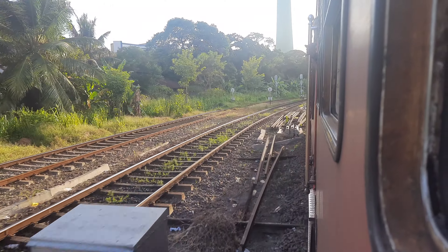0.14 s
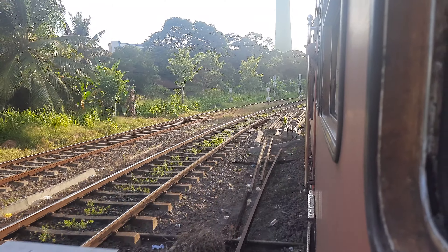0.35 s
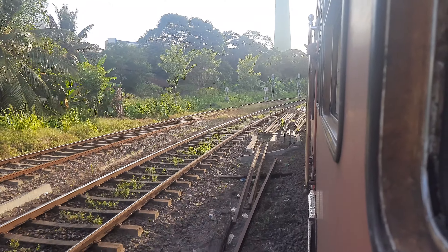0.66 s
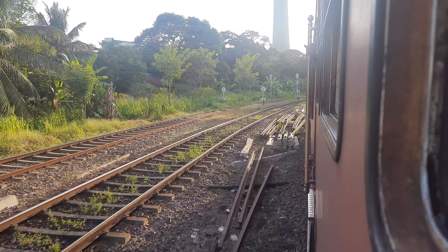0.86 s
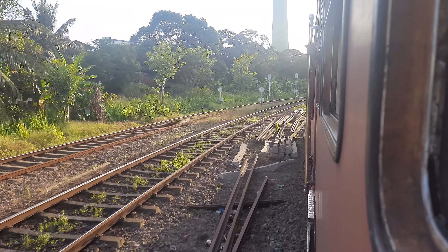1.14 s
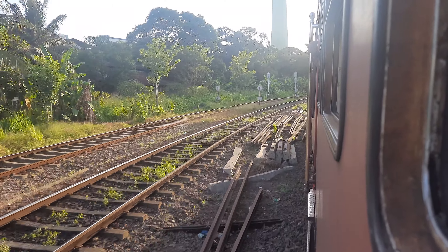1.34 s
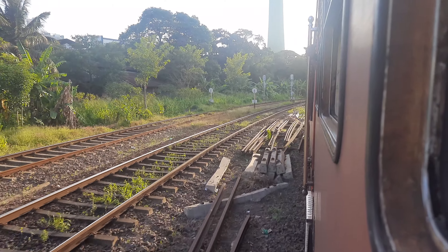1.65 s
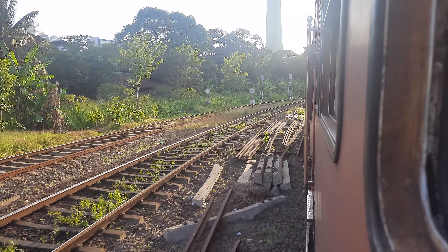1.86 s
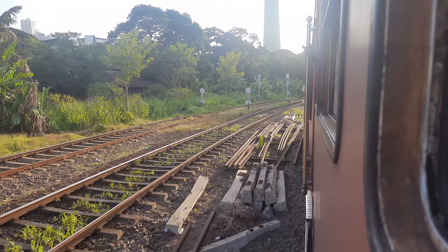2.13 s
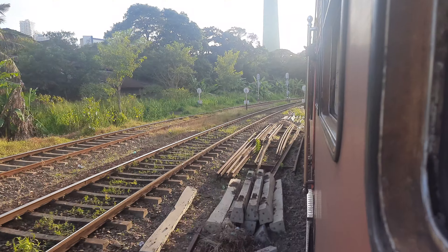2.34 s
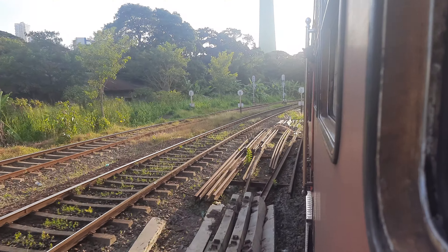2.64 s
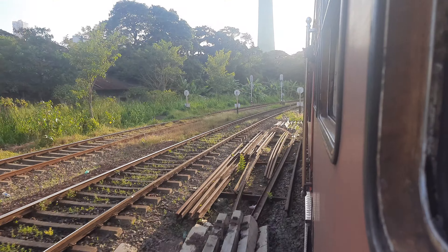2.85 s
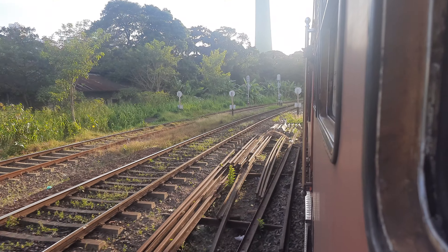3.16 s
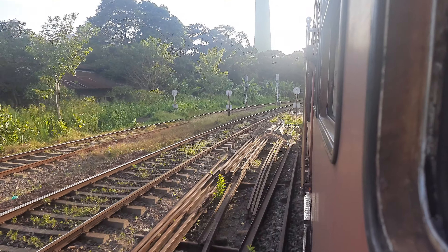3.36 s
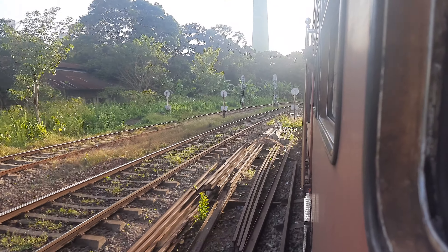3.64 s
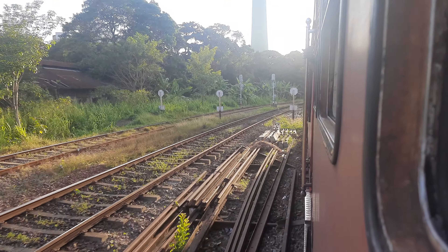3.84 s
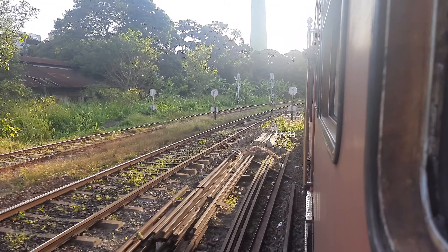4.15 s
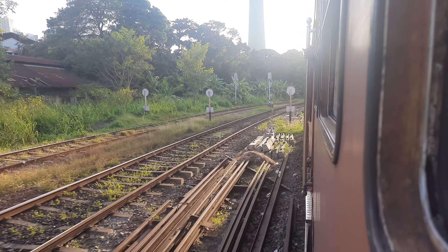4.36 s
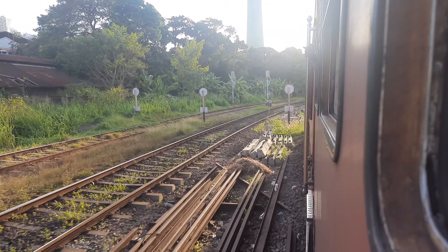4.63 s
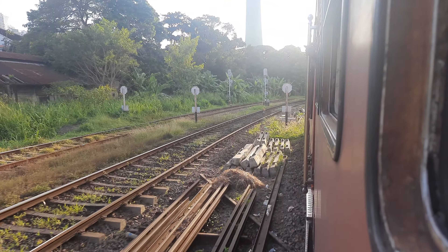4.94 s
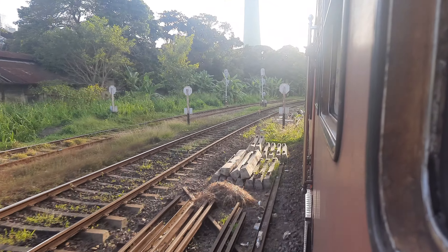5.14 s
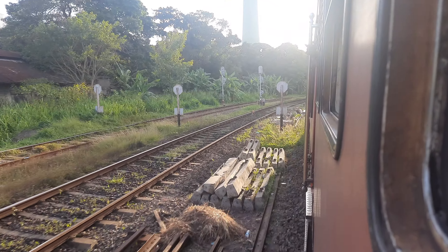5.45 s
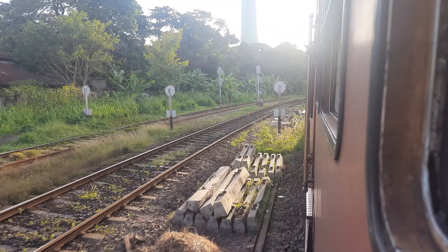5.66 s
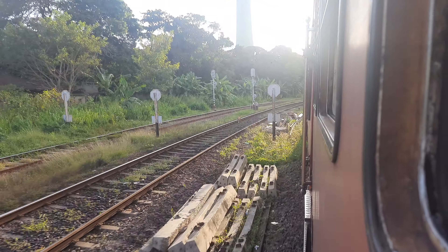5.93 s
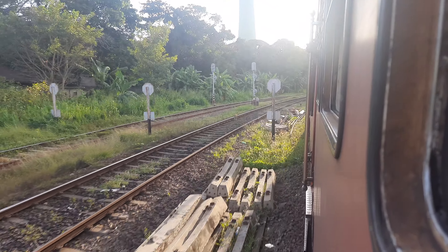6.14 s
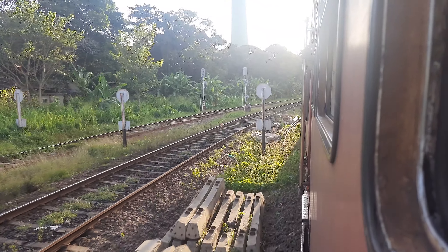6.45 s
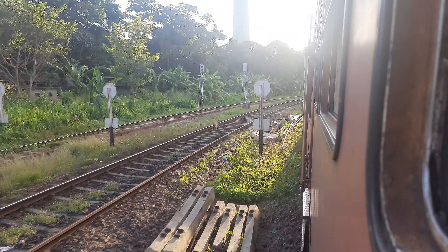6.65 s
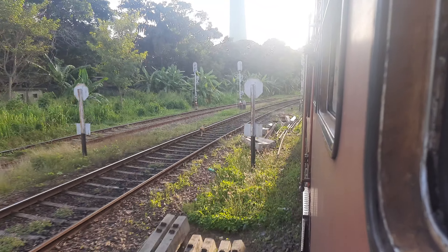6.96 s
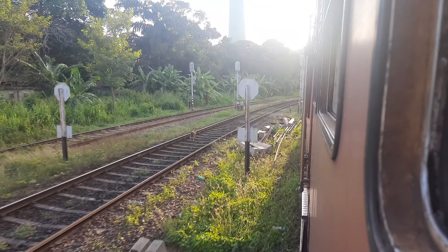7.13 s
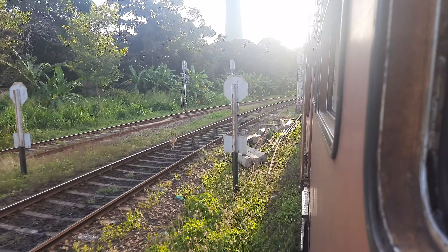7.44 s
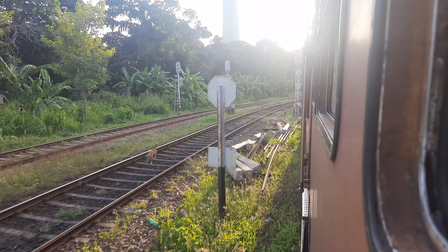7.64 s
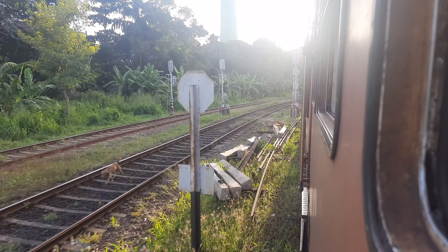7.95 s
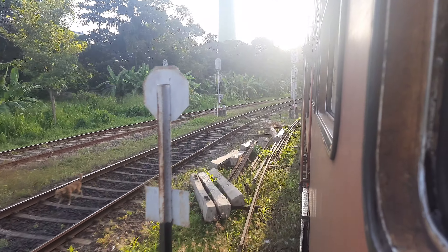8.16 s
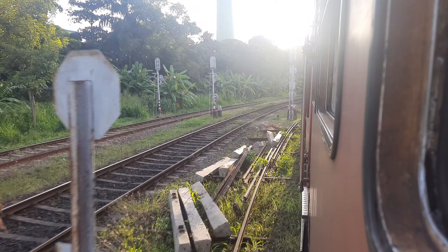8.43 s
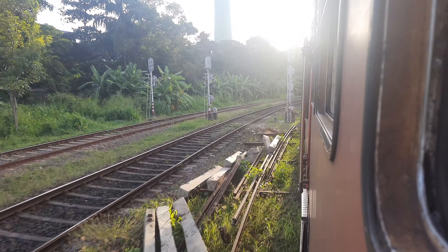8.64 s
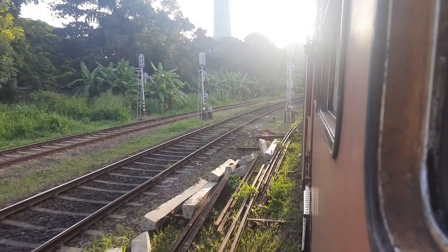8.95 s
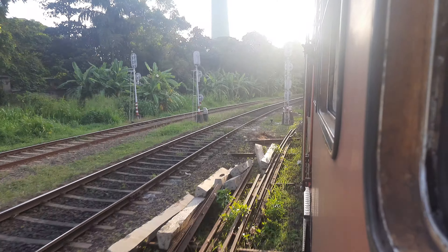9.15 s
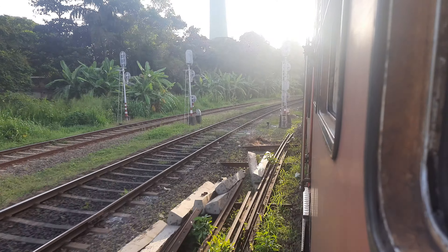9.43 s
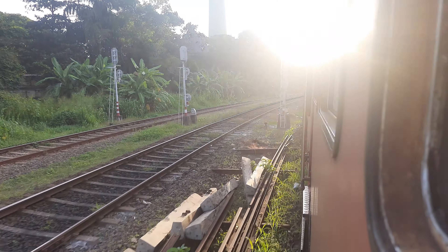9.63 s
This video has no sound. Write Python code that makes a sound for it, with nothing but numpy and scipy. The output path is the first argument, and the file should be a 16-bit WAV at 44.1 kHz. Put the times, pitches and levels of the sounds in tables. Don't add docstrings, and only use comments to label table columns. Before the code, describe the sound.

A slow passenger coach rumbles and knocks over points while wheel flanges scrape and ring in metallic bursts, with one brief distant two-tone horn.

```python
import sys
import numpy as np
from scipy import signal
from scipy.fft import rfft, irfft
from scipy.io import wavfile
from scipy.ndimage import uniform_filter1d

SR = 44100
rng = np.random.default_rng(int(sys.argv[2]) if len(sys.argv) > 2 else 0)


def output_pcm(signal):
    pcm = np.clip(np.atleast_2d(signal).T, -1, 1) * 32767
    wavfile.write(sys.argv[1], SR, np.round(pcm).astype(np.int16))


def linear_from_db(decibels):
    return 10 ** (np.asarray(decibels, float) / 20)


N = 431738
T = np.arange(N) / SR

# [start t/s, length t/s, first level/dB, last level/dB]
SCRAPES = [(-.05, 0.075, -20, -26), (0.084, 0.06, -10, -32.5), (0.216, 0.038, -16, -34),
           (0.272, 0.052, -21, -32.5), (0.48, .02, -29, -37.5), (0.677, 0.07, -52, -27),
           (0.721, 0.16, -31, -30.5), (0.993, 0.57, -44.5, -40.5), (1.13, 0.025, -37, -51),
           (1.445, .03, -18, -33.5), (1.54, 0.18, -46, -40), (2.123, 0.44, -25, -27.5),
           (2.412, 1.244, -22, -23), (3.748, 0.42, -44, -37.5), (4.249, 0.45, -24.5, -34),
           (4.705, 0.47, -41, -57), (5.046, 0.07, -15.5, -26), (5.21, 0.059, -46, -27),
           (5.278, 0.073, -14.5, -25.5), (5.37, 0.092, -26, -24), (5.55, 0.11, -47.5, -50),
           (5.76, 0.15, -53, -38.5), (6.041, 0.19, -30, -33.5), (6.296, 0.28, -41, -36),
           (6.588, 0.69, -35.5, -33.5), (7.147, 0.087, -31, -36), (7.69, 0.94, -20.5, -29.5),
           (8.624, 0.13, -21, -28), (8.905, 0.48, -28, -28.5), (9.054, 0.073, -21, -27),
           (9.515, .3, -34.5, -32.5)]
# [t/s, peak level/dB, rail clank level/dB re the peak]
FLANGE_STRIKES = [(0.1, -18, -4), (0.231, -12.5, -22), (0.288, -21, -23), (0.514, -17.5, -9),
                  (0.682, -18.5, -1), (1.1403, -23, -10), (1.4506, -19.5, -16), (3.8534, -33.5, 14),
                  (4.0, -30, -6), (4.2009, -23, 6), (4.4294, -24, 9), (5.058, -16, -7), (5.229, -18, -2),
                  (5.295, -20.5, 10.5), (5.409, -24, 9), (5.5, -22, 4), (6.0694, -47, 0), (7.3894, -25, 4),
                  (7.696, -22, -11)]
# [f/Hz, width f/Hz, level/dB]
NEAR_WHEEL = [(1745, 75, -6), (2590, 90, -2.5), (2940, 36, -11), (3415, 130, -5), (3960, 45, -13),
              (4250, 70, -3.5), (4660, 96, -14), (5170, 110, -4), (6020, 90, 2), (6870, 120, -5),
              (7730, 140, -2), (8540, 100, -11), (9500, 160, -17), (10350, 270, -13), (11130, 170, -9),
              (11960, 140, -5), (12790, 130, -5), (13570, 150, -8), (14400, 500, -11), (15300, 400, -15)]
# [f/Hz, width f/Hz, level/dB]
OTHER_WHEEL = [(2066, 16, 5.5), (2680, 260, -2), (3590, 1400, -6), (3950, 200, -0.5), (4470, 450, -0.5),
               (5370, 61, -6.5), (6240, 150, -4), (6940, 110, -3.5), (8080, 35, 3), (9500, 77, -9),
               (11340, 97, -4.5), (11430, 150, -3.5), (12500, 300, -5), (13300, 500, -2),
               (14500, 900, -12.5), (15300, 700, -7)]
# [f/Hz, width f/Hz, level/dB]
THIRD_WHEEL = [(1695, 24, -4.5), (2120, 82, 1.5), (2600, 140, -4.5), (3430, 130, -2.5), (4400, 120, 0),
               (5327, 42, -4.5), (6340, 56, -8.5), (7120, 74, -6.5), (8080, 70, -7), (8770, 39, -12),
               (10160, 99, -20), (11420, 73, -10), (12600, 140, -10), (13000, 230, -13)]
# [from t/s, to t/s, share of power]
OTHER_TURNS = [
    (-.1, .06, .5),
    (.69, .95, 1),
    (6.05, 7.55, 1),
    (8.92, 9.9, 1),
]
# [from t/s, to t/s, share of power]
THIRD_TURNS = [
    (2.13, 2.436, 0.59),
    (4.26, 4.948, 0.59),
]
# [from t/s, to t/s, f/Hz, level/dB]
WAVERS = [(0.098, .3, 4250, 4), (.3, .7, 1745, -9), (1.2, 1.6, 3415, 3), (2.202, 2.496, 2590, -2.5),
          (2.296, 2.4, 5327, -14), (2.1, 2.398, 3415, -5), (2.503, 2.8, 1745, -6), (2.6, 2.9, 5170, -3),
          (2.9, 3.1, 3415, -3.5), (2.9, 3.5, 4250, 2), (2.996, 3.196, 2590, -3.5), (3.1, 3.293, 1745, -5),
          (3.3, 3.397, 7730, -1.5), (3.295, 3.7, 3415, -0.5), (3.597, 3.7, 4250, -4),
          (4.385, 4.49, 1695, 10), (4.493, 4.6, 4400, 6), (4.288, 4.6, 5327, 5), (4.698, 5.0, 8000, 11.5),
          (5.2, 5.4, 7730, -2.5), (5.41, 5.493, 5170, 5), (5.6, 5.8, 6870, 5), (6.203, 7.3, 6940, -7),
          (7.688, 7.9, 1745, -4.5), (7.8, 7.9, 2590, 2.5), (7.9, 8.802, 3415, -3.5), (7.9, 8.0, 4250, -1),
          (7.897, 8.0, 5170, -4), (8.095, 8.2, 6020, -1), (8.1, 8.5, 2590, 1.5), (8.492, 8.8, 2590, -6.5),
          (8.498, 8.698, 1745, -11), (8.5, 8.9, 5170, -5), (8.4, 8.6, 6870, -5)]
# [start t/s, length t/s, level/dB]
SHRILL = [
    (0.486, 0.15, 8.5),
    (1.0, 0.54, 1.5),
    (4.004, 0.45, -1.5),
    (5.388, 0.26, 6),
    (8.552, 0.33, 4.5),
    (9.448, .3, 2.5),
]
# [f/Hz, level/dB per Hz]
FRICTION_HISS = [(590, -43), (1000, 13.5), (1450, -7), (1750, 9), (2280, 5.5), (2590, 1), (3460, -8.5),
                 (3750, -14), (6040, -19.5), (7880, -13.5), (9280, -29.5), (12400, -22), (16000, -32)]
# [f/Hz, level/dB per Hz]
TRAIN_HISS = [(1200, -0.5), (3500, -6), (9000, -15.5), (15000, -23)]
# [t/s, shake level/dB, floor level/dB]
ROLLING = [(0, -30.5, -3), (.54, -35.5, -3.5), (.98, -31, -2), (1.75, -27.5, -1), (1.9, -32, -6),
           (2.1, -29.5, 1), (2.3, -40, 2.5), (3.45, -39, 3), (3.7, -31.5, -9), (4.7, -36, -4),
           (5.2, -33, 3.5), (5.5, -30, -2), (7.3, -27.5, -7), (7.65, -37, 6), (8.3, -33.5, -5.5),
           (8.8, -30, 3), (9.2, -30, -5), (9.79, -20.5, -22)]
# [f/Hz, level/dB per Hz]
RUMBLE = [(15, -52), (25, 18), (86, 12), (167, -8.5), (209, -1.5), (249, -6), (286, -4), (377, -13),
          (544, -11), (812, -11.5), (933, -10), (1250, -18), (1600, -14), (2080, -23), (3520, -120)]
# [t/s, peak level/dB, bogie f/Hz]
KNOCKS = [(0.126, -17, 108), (0.516, -11.5, 97), (0.894, -4.5, 288), (1.122, -7.5, 155), (1.451, -5, 104),
          (1.688, -10, 141), (2.05, -21, 129), (3.175, -17, 195), (3.584, -13, 298), (3.691, -12.5, 240),
          (3.85, -5.5, 220), (3.998, -10.5, 324), (4.112, -10, 415), (4.225, -5.5, 213), (4.417, -9.5, 158),
          (4.611, -11.5, 277), (5.232, -8, 139), (5.295, -6, 209), (5.543, -8, 283), (5.794, -15, 201),
          (5.889, -15, 113), (6.302, -10.5, 220), (6.485, -13, 243), (7.078, -7.5, 147), (7.205, -6.5, 225),
          (7.386, -5, 307), (8.366, -9.5, 271), (8.731, -8.5, 99), (9.033, -12, 151), (9.334, -11, 229)]
# [t/s, peak level/dB, f/Hz]
JOLTS = [(0.078, -12.5, 221), (0.311, -22, 223), (0.692, -11.5, 219), (0.768, -10.5, 296),
         (0.998, -12, 313), (1.199, -13, 283), (1.648, -32, 86.1), (1.739, -22, 80.7), (2.121, -13, 266),
         (2.316, -17.5, 237), (2.389, -13.5, 119), (2.429, -13, 157), (2.495, -20, 102), (2.588, -12, 188),
         (2.719, -35, 132), (3.1, -34, 80.7), (3.254, -12.5, 121), (3.359, -21, 140), (3.633, -27, 269),
         (3.779, -18, 290), (4.573, -25, 277), (4.658, -9, 306), (4.909, -12, 278), (5.387, -11, 81),
         (5.457, -12, 304), (5.676, -17, 114), (5.834, -12, 135), (6.07, -13, 215), (6.103, -30, 94.2),
         (6.209, -9.5, 223), (6.369, -14, 223), (6.581, -12, 222), (6.634, -12, 240), (6.693, -24, 234),
         (6.783, -10, 231), (6.807, -11, 102), (6.875, -10, 255), (6.991, -9, 108), (8.491, -4, 136),
         (8.554, -5.5, 230), (8.689, -10, 310), (8.807, -9, 291), (8.88, -11, 96.8), (9.064, -6.5, 199),
         (9.145, -8, 270), (9.216, -22, 243), (9.354, -12, 280), (9.403, -6.5, 215), (9.47, -5, 306),
         (9.509, -8, 310), (9.615, -19, 280), (9.652, -19, 282), (9.739, -19, 276)]
# [start t/s, length t/s, level/dB]
LULLS = [(1.259, 0.077, -5.5), (1.87, 0.066, -4), (1.974, .03, -5), (2.9, 0.23, -2.5), (4.294, 0.049, -1.5),
         (5.5, .1, -3), (5.777, 0.054, 3), (5.936, 0.12, -3), (6.38, 0.25, -2.5), (1.7, 0.16, -1.5),
         (5.29, 0.032, -3), (4.2, 0.036, 4), (6.32, 0.05, -2.5), (5.67, 0.015, 4.5), (3.1, 0.076, 1.5),
         (3.92, .06, -2.5), (8.95, .06, 0.5)]
# [from t/s, to t/s, f/Hz, level/dB]
SINGING = [(0, .14, 622, -30.5), (1.5, 1.77, 4300, -41), (2.39, 2.47, 4388, -30), (2.85, 3.01, 920, -35),
           (5.06, 5.18, 3410, -33), (5.07, 5.22, 2600, -34), (5.3, 5.38, 3410, -33), (5.5, 5.62, 2600, -38),
           (8.2, 8.48, 2590, -33), (2.52, 2.59, 2600, -33), (7.8, 8.3, 880, -39), (1.42, 1.68, 97, -21.5),
           (3.22, 3.65, 1654, -42), (3.68, 3.8, 520, -29), (4.38, 4.62, 945, -40), (5.29, 5.34, 1740, -33),
           (5.41, 5.51, 1743, -28.5), (3.68, 3.8, 270, -29), (6.6, 7.4, 4690, -43), (7.2, 7.36, 2000, -37),
           (8.65, 8.75, 4250, -34), (8.95, 9.42, 4370, -33), (9.0, 9.4, 8000, -33), (8.75, 8.92, 100, -25),
           (6.75, 7.1, 100, -28), (9.45, 9.75, 290, -25), (5.53, 5.66, 3410, -40), (.69, .9, 760, -40.5),
           (.05, .38, 930, -44.5), (6.55, 6.85, 270, -29),
           (2.46, 2.52, 5170, -30), (2.55, 2.72, 6020, -27.5), (2.58, 2.7, 8000, -27),
                (2.18, 2.3, 4380, -32), (6.8, 7.01, 1996, -42), (2.29, 2.33, 2120, -36),
                (2.801, 2.9, 6700, -33), (4.5, 4.6, 1720, -35.5), (1.7, 1.79, 280, -26),
                (4.58, 4.63, 320, -25), (5.06, 5.14, 6300, -36), (3.0, 3.8, 6020, -31.5),
                (8.08, 8.25, 870, -33), (5.07, 5.12, 5150, -34), (5.41, 5.5, 7750, -31),
                (3.36, 3.55, 5150, -32), (2.95, 3.09, 1750, -35), (8.65, 8.72, 6900, -30),
                (9.65, 9.71, 313, -25), (9.5, 9.6, 550, -32.5), (8.52, 8.6, 220, -26.5),
                (.1, .15, 3100, -38), (0.11, .14, 6020, -35), (.235, .26, 6020, -34),
                (.235, .26, 4300, -34), (.285, .31, 6500, -33), (2.64, 2.9, 920, -38),
                (2.47, 2.54, 1250, -40), (5.6, 5.78, 6020, -38), (.76, .85, 4000, -35),
                (.72, .8, 8010, -37), (7.72, 7.8, 6870, -30), (.1, .16, 3400, -35), (5.55, 5.6, 250, -23),
                (5.4, 5.5, 380, -31), (4.0, 4.05, 300, -27)]
# [start t/s, length t/s, level/dB, upper multiples last t/s]
SQUEAKS = [
    (6.597, 0.066, -27.5, .08),
    (6.73, 0.1, -27, .04),
    (6.886, 0.075, -32.5, .001),
]
# [t/s, f/Hz]
SLIP_RATE = [(6.57, 404), (6.68, 401), (6.75, 392), (7.02, 389)]
# [multiple, level/dB, group: 0 lower, 1 upper]
SQUEAK_ORDERS = [(2, 0, 0), (3, -2, 1), (4, 0, 1), (6, -11, 1), (7, -10, 1), (8, -12, 1)]
# [start t/s, length t/s, level/dB]
BRACKET = [
    (6.594, 0.07, -27.5),
    (6.681, .025, -29.5),
    (6.758, 0.012, -28),
    (6.846, 0.03, -37),
]
# [low pipe level/dB, high pipe level/dB]
HORN_PARTIALS = [(0.5, -28), (2.5, -17), (1, -7), (-14, -19), (-9.5, -26)]
# [level/dB, swell level/dB per s, echo level/dB re the blast]
HORN_VOICE = [(-25.5, -7, 2.5), (-26.5, -3.5, -2), (-22.5, -27, -10)]
# [f/Hz, likeness 0 to 1]
LIKENESS = [(40, .76), (100, .86), (400, .7), (800, .68), (1500, .5), (3000, .35), (6000, .2), (15000, .12)]
# [f/Hz, level/dB]
TILT = [(60, -1.5), (240, 0.5), (950, 2.5), (3770, 1.5), (15000, 0.5)]
# [f/Hz, phase/radians]
LEAD = [(0, 0), (300, .4), (700, .4), (1400, 1.3), (2600, 2.6), (16000, 22)]


def flange():
    scrape_db = rub_db()
    other, third = wheel_share(OTHER_TURNS), wheel_share(THIRD_TURNS)
    near = np.clip(1 - other - third, 0, 1)
    white = rng.standard_normal((2, N)) * linear_from_db(0.68 * drift(54))
    rings = 0
    for share, modes in [(near, NEAR_WHEEL), (other, OTHER_WHEEL), (third, THIRD_WHEEL)]:
        rings = rings + np.sqrt(share) * wheel_rings(white, modes)

    low_db = -2.5 + 0.36 * (scrape_db + 26.5)
    top_db = -4 + 0.1 * (scrape_db + 33.5) + (other + third)
    top_db = top_db + sum(db * gate(s, s + length, 0.09, 0.056) for s, length, db in SHRILL)
    ring_db = 11 + .6 * (scrape_db + 28) - 5 * other + 4 * third
    ring_share = 1 / (1 + linear_from_db(-2 * ring_db))
    hiss = rng.standard_normal((2, N)) * linear_from_db(2.0 * drift(28.0))
    bands = [(1100, 4500, low_db), (4500, 9200, 0), (9200, 18000, top_db)]
    scrape = 0
    for ring, (low_hz, high_hz, db) in zip(rings, bands):
        band_hiss = coloured(hiss, FRICTION_HISS, low_hz, high_hz)
        mix = np.sqrt(ring_share) * ring + np.sqrt(1 - ring_share) * band_hiss
        scrape = scrape + linear_from_db(db) * mix

    strikes = sum(linear_from_db(db - 9.0) * gate(s, s + .003, 0.0023, 0.031) for s, db, _ in FLANGE_STRIKES)
    clanks = sum(linear_from_db(db - 13.0 + clank_db) * gate(s, s + 0.008, 0.003, 0.025)
                 for s, db, clank_db in FLANGE_STRIKES)
    far = rng.standard_normal((2, N))
    out = linear_from_db(scrape_db) * scrape + strikes * rms_one(scrape)
    out = out + clanks * coloured(far, TRAIN_HISS, 300, 2600)
    return out + linear_from_db(-44) * coloured(far[:, ::-1], TRAIN_HISS, 1930, 15000)


def rub_db():
    grip_s, let_go_s, idle_db = 0.052, 0.1, -46.5
    power = linear_from_db(2 * idle_db)
    for start, length, first_db, last_db in SCRAPES:
        span = slice(max(round(start * SR), 0), round((start + length + .5) * SR))
        t = T[span] - start
        shape = np.clip(t / grip_s, 0, 1) * np.exp(-np.clip(t - length, 0, None) / let_go_s)
        rub = np.zeros(N)
        rub[span] = (shape * linear_from_db(np.interp(t, [0, length], [first_db, last_db]))) ** 2
        power = power + rub
    return 10 * np.log10(power)


def wheel_share(turns):
    return np.clip(sum(part * gate(start, end, .02, .02) for start, end, part in turns), 0, 1)


def wheel_rings(white, modes):
    rings = np.zeros((3, 2, N))
    for hz, width_hz, db in modes:
        group = int(hz > 4500) + int(hz > 9200)
        skirt_hz = 400 + 150 * (hz > 4500) + 600 * (hz > 9200)
        ring = resonate(resonate(white, hz, .85 * width_hz), hz, skirt_hz)
        slow_db = (1.2 + (hz < 8200) * (2 + 2 * (db < -10))) * drift(6)
        quick_db = (1.4 + (hz < 8200)) * drift(30)
        ring *= linear_from_db(db + slow_db + quick_db)
        ring *= linear_from_db(sum(change_db * gate(start, end, .04, .04)
                        for start, end, near_hz, change_db in WAVERS if abs(near_hz - hz) < 140))
        rings[group] += ring
    return np.array([rms_one(ring) for ring in rings])


def rolling():
    pops = (rng.random(N) < 70 / SR) * linear_from_db(3 * np.minimum(rng.exponential(1, N), 3))
    pops = pops * rng.choice([-1, 1], N)
    noise = rng.standard_normal((2, N)) + 3 * resonate(rms_one(pops), 230, 260) / 10
    floor, bogie, rail = [coloured(noise, RUMBLE, low_hz, high_hz)
                          for low_hz, high_hz in [(53, 150), (150, 450), (450, 1500)]]
    floor_boom = rms_one(resonate(noise, 75.5, 53))
    floor = rms_one(floor + linear_from_db(35) * floor_boom)

    shake_db, floor_db = in_time(ROLLING)
    rail_level = np.hypot(linear_from_db(-7.5 - 34.5 + (shake_db + 28.0)), linear_from_db(-16.5 + rub_db()))
    shudder = sum(linear_from_db(db) * gate(s, s + 0.013, 0.023, 0.045) for s, db, hz in KNOCKS)
    shudder = shudder + sum(linear_from_db(db - 8.0) * gate(s, s + 0.0088, 0.012, 0.013) for s, db, hz in JOLTS)
    lumps = drift(9.0)
    layers = [(floor, linear_from_db(floor_db + shake_db), -25, 1),
              (bogie, linear_from_db(shake_db), -14, 1),
              (rail, rail_level, -34, .5)]
    out = 0
    for part, steady, shudder_db, swing in layers:
        level = np.hypot(steady, linear_from_db(shudder_db) * shudder)
        out = out + level * linear_from_db(swing * (1.8 * lumps + 1.4 * drift(9))) * part
    out *= linear_from_db(sum(db * gate(s, s + length, 0.017, 0.017) for s, length, db in LULLS))

    rattle = .5 * bogie + 0.22 * rail
    for s, db, hz in KNOCKS + JOLTS:
        span = slice(round(s * SR), round(s * SR) + 6000)
        t = T[span] - s
        blow = (1 - np.exp(-t / 0.00089)) * np.exp(-t / 0.017)
        out[:, span] += linear_from_db(db - 9.5) * blow * (np.sin(2 * np.pi * hz * t) + 0.48 * rattle[:, span])
    return out


def singing():
    out = np.zeros((2, N))
    for start, end, hz, db in SINGING:
        span = slice(round(start * SR), round((end + .3) * SR))
        width_hz = 30 + .012 * hz + 70 * (450 < hz < 600)
        noise = rng.standard_normal((2, len(T[span])))
        tone = resonate(resonate(noise, hz, width_hz), hz, width_hz)
        tone = tone / (uniform_filter1d(tone ** 2, 1500) + 1e-12) ** .3
        out[:, span] += linear_from_db(db) * gate(start, end, .015, .03)[span] * rms_one(tone)
    return out


def squeak():
    rise_s, fall_s = 0.011, 0.029
    lower = sum(linear_from_db(db) * gate(s, s + length, rise_s, fall_s) for s, length, db, _ in SQUEAKS)
    upper = sum(linear_from_db(db - 2.5) * gate(s - .01, s + upper_s, rise_s, fall_s)
                for s, _, db, upper_s in SQUEAKS[:2])
    bracket = sum(linear_from_db(db) * gate(s, s + length, rise_s, fall_s) for s, length, db in BRACKET)
    levels = lower, upper

    waver = 1 + .004 * drift(25)
    slip_hz, = in_time(SLIP_RATE)
    slips = 2 * np.pi * np.cumsum(slip_hz * waver) / SR
    mode = 2 * np.pi * np.cumsum(1996 * waver) / SR
    paths = []
    for path, start in enumerate(2 * np.pi * rng.random((2, 9))):
        tone = sum(levels[group] * linear_from_db(db - 2.5 + 4.0 * drift(45)) * np.sin(k * slips + start[k])
                   for k, db, group in SQUEAK_ORDERS)
        ring = np.sin(mode - path * np.pi / 2) + 0.2 * np.sin(2 * mode + 2 * path)
        paths.append(tone + bracket * linear_from_db(3.2 * drift(30)) * ring)
    rasp = linear_from_db(-2.5) * upper * coloured(rng.standard_normal((2, N)), TRAIN_HISS, 900, 6200)
    return 1.54 * np.array(paths) + rasp


def horn():
    pipes_hz = 314.2, 323.3
    opens, shuts = 7.77, 8.27
    speak_s, echo_s, echo_ends_s = .02, .35, 8.66
    levels = []
    for k, (db, swell, echo_db) in enumerate(HORN_VOICE):
        speaks = opens + k * speak_s
        blast = (1 - linear_from_db(echo_db)) * gate(speaks, shuts, .05, .03)
        echo = linear_from_db(echo_db) * gate(speaks, shuts, .05, echo_s)
        levels.append(linear_from_db(db + swell * (np.clip(T, opens, shuts) - opens)) * (blast + echo))

    phase = 2 * np.pi * np.cumsum(1 + .003 * drift(15)) / SR
    paths = []
    for start in 2 * np.pi * rng.random((2, 5, 2)):
        chord = 0
        for k, partial_db in enumerate(HORN_PARTIALS):
            for pipe, (hz, db) in enumerate(zip(pipes_hz, partial_db)):
                tone = np.sin((k + 1) * hz * phase + start[k][pipe])
                chord = chord + levels[min(k, 2)] * linear_from_db(db + 2.2 * drift(21.0)) * tone
        paths.append(chord)
    return 1.44 * gate(0, echo_ends_s, .01, 0.048) * np.array(paths) * [[1], [.6]]


def rms_one(x):
    return x / np.sqrt(np.mean(x ** 2) + 1e-20)


def in_time(rows):
    s, *columns = np.transpose(rows)
    return [np.interp(T, s, column) for column in columns]


def at_hz(points, hz):
    points_hz, values = np.transpose(points)
    return np.interp(np.log(hz + 1), np.log(points_hz + 1), values)


def drift(rate):
    r = np.exp(-80 * np.pi * rate / SR)
    slow = signal.lfilter([1], [1, -2 * r, r * r], rng.standard_normal(N // 40 + 2002))[2000:]
    return np.interp(np.arange(N) / 40, np.arange(len(slow)), rms_one(slow))


def resonate(x, hz, width_hz):
    r = np.exp(-np.pi * width_hz / SR)
    feedback = [1, -2 * r * np.cos(2 * np.pi * hz / SR), r * r]
    return signal.lfilter([(1 - r * r) / 2, 0, (r * r - 1) / 2], feedback, x)


def coloured(x, spectrum, low_hz, high_hz):
    hz = np.fft.rfftfreq(N, 1 / SR)
    band = 1 / np.sqrt((1 + (low_hz / (hz + 1)) ** 8) * (1 + (hz / high_hz) ** 8))
    return rms_one(irfft(rfft(x) * linear_from_db(at_hz(spectrum, hz)) * band, N))


def gate(start, end, rise, fall):
    out = np.zeros(N)
    span = slice(max(int(start * SR), 0), int((max(start, end) + rise + 12 * fall) * SR))
    t = T[span]
    out[span] = np.clip((t - start) / rise, 0, 1) * np.exp(-np.clip(t - end, 0, None) / fall)
    return out


def scene():
    direct, scattered = rfft(flange() + rolling() + singing() + squeak() + horn())
    hz = np.fft.rfftfreq(N, 1 / SR)
    alike = at_hz(LIKENESS, hz)
    shared = np.sqrt((1 + alike) / 2) * direct
    apart = np.sqrt((1 - alike) / 2) * scattered
    lead = np.exp(.5j * np.interp(hz, *np.transpose(LEAD)))
    tilt = linear_from_db(at_hz(TILT, hz) / 2)
    left = (shared + apart) * lead * tilt
    right = (shared - apart) / lead / tilt
    return linear_from_db(1.0) * irfft(np.array([left, right]), N)


def top_cut(x):
    return signal.sosfilt(signal.butter(12, 16760, fs=SR, output="sos"), x)


def record(dry):
    rounded = .8 * np.tanh(dry / .8)
    edge = signal.ellip(14, .5, 100, 15740, fs=SR, output="sos")
    return top_cut(signal.sosfilt(edge, rounded))


dry = scene()
out = record(dry)
output_pcm(out)
```